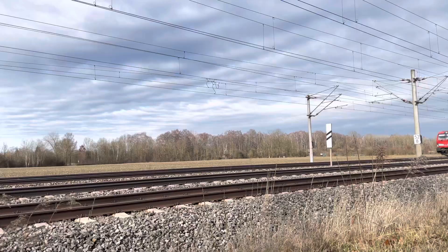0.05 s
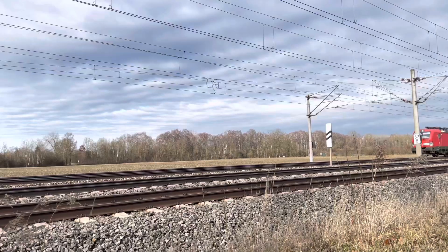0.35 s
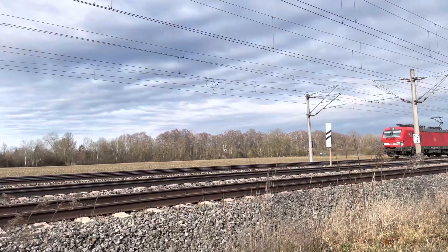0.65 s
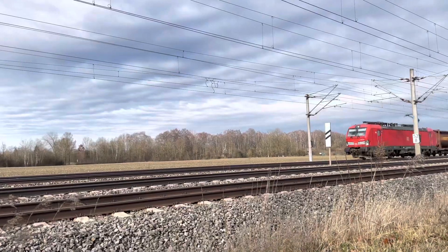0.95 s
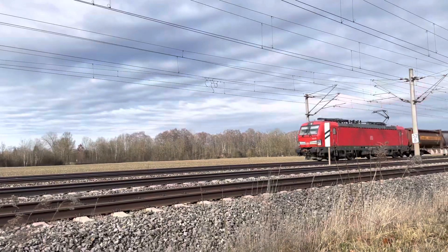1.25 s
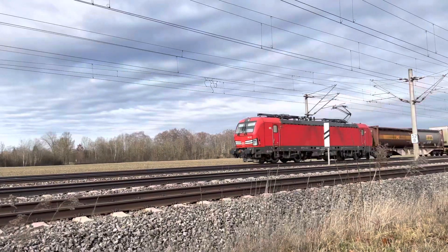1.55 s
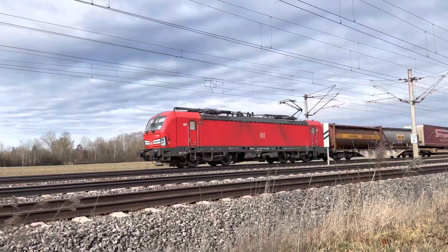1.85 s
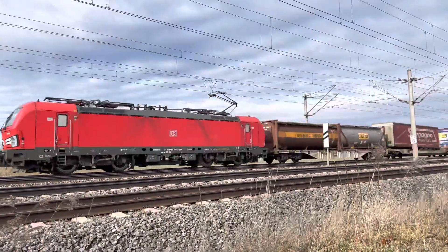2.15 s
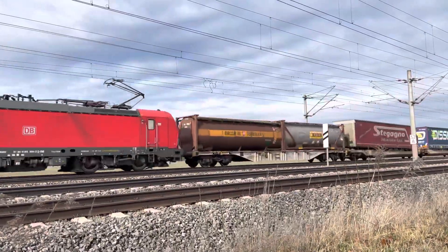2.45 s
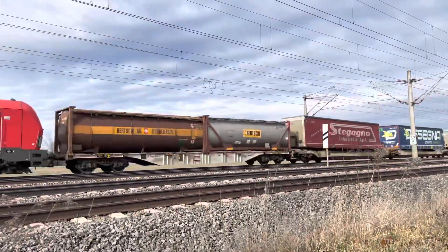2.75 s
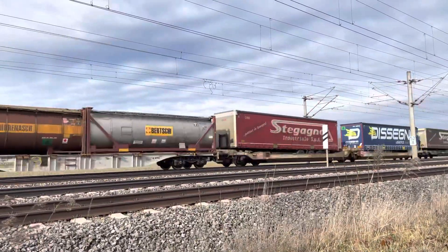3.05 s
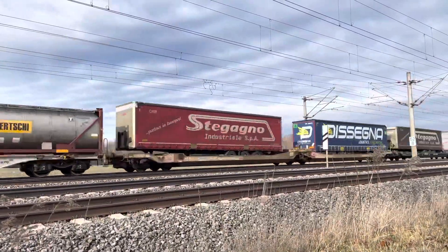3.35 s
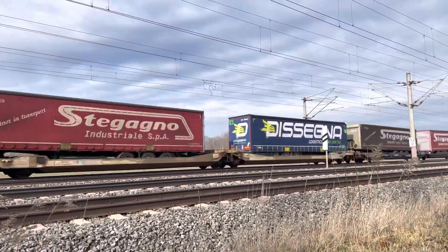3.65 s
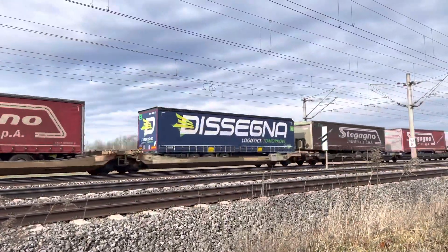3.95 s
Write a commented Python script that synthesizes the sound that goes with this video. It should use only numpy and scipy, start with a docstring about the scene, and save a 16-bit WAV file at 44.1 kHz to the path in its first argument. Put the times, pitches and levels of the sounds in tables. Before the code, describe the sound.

A freight train roars by from right to left, rails hissing and wind rumbling.

```python
"""Wind buffets the microphone and stirs dry grass while the rails hiss and sing off to the right.
Then an electric freight train rushes past, right to left, 18 m from a phone standing in open fields.
Each bogie adds its rolling roar, and the locomotive's whine falls in pitch as it goes by.
The phone's wind filter folds the bass to mono."""
import sys
import numpy as np
from scipy import signal
from scipy.fft import rfft, irfft
from scipy.io import wavfile

SR = 44100
rng = np.random.default_rng(int(sys.argv[2]) if len(sys.argv) > 2 else 0)


def digitize_waveform(pressure):
    """Quantize a signal to 16-bit integers and store it at the path in sys.argv[1].

    Rows of a 2-D input are taken as channels; values are limited to [-1, 1].
    """
    field = np.atleast_2d(pressure).T
    bounded = np.clip(field, -1, 1)
    quanta = np.round(bounded * 32767).astype(np.int16)
    wavfile.write(sys.argv[1], SR, quanta)


N = 176400
T = np.arange(N) / SR
FRAME, OVERLAP = 1024, 768
HZ, FRAME_S = signal.stft(np.zeros(N), SR, nperseg=FRAME, noverlap=OVERLAP)[:2]
HZ = np.maximum(HZ, 1)[:, None]
SIDES = np.array([1, -1])[:, None, None]  # left, right

SPEED_M_S, TRACK_M, SOUND_M_S = 27, 18, 343
AHEAD_M, SWING_M, PORT_LAG_S = 26.6, 17.4, 0.000445  # the phone aims AHEAD_M before the nearest point
CROSS_S, CROSS_LENGTH_S = 2.13, 0.15  # the roar moves from right to left
WHINE_HZ, WHINE_PASS_S, WAGONS_FROM_S = 633.8, 2.92, 3.1

# Bogies going by. Each row: time in seconds when nearest the microphone, relative level in dB.
BOGIE_PASSES = [(2.5, -3), (2.9, -1.5), (3.4, -3.5), (4.0, -5), (4.55, -1), (5.2, -22)]
# Roar of rolling wheels. Each row: frequency in Hz, relative level in dB.
ROAR_SPECTRUM = [(60, -78), (130, -58.5), (215, -54), (330, -61.5), (480, -55), (640, -53.5), (850, -54),
                 (1080, -52.5), (1300, -56.5), (1800, -58.5), (2400, -63), (3300, -61.5), (4200, -66),
                 (5200, -64.5), (6600, -68), (7600, -72.5), (9500, -77), (13000, -85), (14200, -96),
                 (15000, -109)]
# Tone of the wagons' bogies. Each row: frequency in Hz, gain over the locomotive's in dB.
WAGON_COLOUR = [(220, -5), (330, -4), (450, -5.5), (700, -1), (900, -6), (1200, 1.5), (1600, 1.5),
                (2300, -0.5), (7000, 1), (9000, -2)]
# Swells of the whine's partials. Each row: multiple of the pitch, width in Hz, level in dB,
# peak time in seconds, half-length in seconds, left minus right in dB.
WHINE_PARTIALS = [(.98, 12, -32, 2.62, 0.28, -5), (1.005, 11, -34.5, 3.37, 0.3, 4),
                  (2, 18, -25, 2.964, 0.21, 0.5), (2, 76, -29, 2.56, .3, 4),
                  (1.985, 50, -32, 2.24, 0.12, 11), (2.97, 35, -34, 1.944, 0.095, -1),
                  (2.96, 41, -30.5, 2.33, .18, -19), (3.11, 24, -34, 2.22, .2, -11),
                  (3.02, 19, -33.5, 3.13, 0.12, -7), (3.02, 35, -32, 3.556, 0.096, -1),
                  (3.14, 210, -32, 2.26, 0.41, -17)]
# Hiss of the leading wheels. Each row: frequency in Hz, density in dB per Hz.
SIZZLE_SPECTRUM = [(1500, -77), (2900, -68), (5000, -80.5), (7000, -79.5), (8400, -73), (10000, -80),
                   (13000, -94), (15000, -109)]
# Hiss of the rails and distant wagons. Each row: frequency in Hz, relative level in dB.
RAIL_SPECTRUM = [(100, -90), (450, -61), (650, -62), (850, -71), (1100, -64), (1550, -66), (1900, -72),
                 (2300, -84), (2900, -74.5), (3700, -81), (4400, -87), (5200, -82), (6600, -87.5),
                 (8300, -94.5), (9800, -100), (13000, -102), (15000, -112)]
# Rise and fall of that hiss. Each row: time in seconds, gain in dB.
RAIL_SWELL = [(0, -10), (.45, -7), (.75, -3), (1.3, -1), (1.8, 5), (2.5, 5), (4, -8)]
# Singing of the rails. Each row: frequency in Hz, width in Hz, peak density in dB per Hz.
RAIL_RESONANCES = [(1544, 70, -63), (2360, 38, -68.5), (2504, 67, -81.5), (3090, 130, -77),
                   (3930, 130, -76.5), (4400, 150, -79.5)]
# Sound off ballast and wagon sides. Each row: frequency in Hz, scattered over direct in dB.
TRACKSIDE_SCATTER = [(300, -6.5), (1400, -3.5), (3000, 8.5), (7000, 7.5), (9000, 3.5), (12500, 3)]
# Balance of a source on either side of the phone. Each row: frequency in Hz, left minus right in dB.
RIGHT_BALANCE = [(900, -0.5), (1300, 0), (1500, -25), (1750, -12), (2100, 13), (2700, 0), (3300, -3),
                 (3850, -10), (4600, -1), (5400, 3.5), (7200, -3)]
LEFT_BALANCE = [(150, -3), (400, 7.5), (700, 10.5), (1000, 2), (1400, 0.5), (1800, -1.5), (3000, -0.5)]
# Wind rumble on the microphone. Each row: frequency in Hz, relative level in dB.
WIND_SPECTRUM = [(20, -82), (32, -63), (44, -47.5), (70, -49.5), (110, -54.5), (145, -60.5), (205, -59),
                 (400, -69.5), (800, -79), (2000, -110), (8000, -150)]
# Gusting of that wind. Each row: time in seconds, gain in dB.
WIND_GUSTS = [(0, -7.5), (.24, -4), (.32, -1), (.6, 2), (1, -3.5), (1.4, 1.5), (1.7, -1.5), (2.1, -0.5),
              (2.6, -0.5), (3.1, -1.5), (3.4, -3.5), (3.7, 1), (4, 0)]
# Buffets on the microphone, and two crisp crackles of dry grass near 0.55 s. Each row: start in seconds, level
# in dB, centre in Hz, decay in seconds.
WIND_BUFFETS = [(.095, -42.5, 1500, 0.013), (0.261, -26, 470, 0.007), (0.284, -17.5, 70, 0.031),
                (0.311, -26, 210, 0.013), (0.327, -20.5, 148, 0.01), (0.39, -26, 219, 0.024),
                (0.456, -24, 170, 0.009), (0.516, -22, 236, 0.01), (0.537, -20.5, 69, 0.018),
                (0.544, -48, 1570, 0.011), (0.572, -36, 1880, 0.0031), (0.614, -32, 380, 0.047),
                (0.764, -19, 340, 0.008), (0.773, -17, 89.5, 0.017), (.783, -33, 510, 0.02),
                (.79, -24.5, 130, .009), (.943, -26, 523, 0.0063), (1.17, -24.5, 156, 0.015),
                (1.426, -20.5, 87, 0.018), (1.439, -21.5, 111, 0.036), (1.457, -19.5, 245, 0.017),
                (1.487, -20.5, 274, 0.0079), (2.481, -24, 78.5, 0.019), (2.564, -24, 85.4, 0.021),
                (3.531, -23, 216, 0.033), (3.604, -12, 71, 0.0057)]
# Dry grass close by. Each row: start in seconds, level in dB, decay in seconds.
GRASS_RUSTLES = [(.247, -60, 0.013), (0.445, -51.5, 0.012)]
# Tone of a rustle. Each row: frequency in Hz, relative level in dB.
GRASS_SPECTRUM = [(4000, -14), (6500, -2), (9500, -6), (13000, -9), (15000, -19)]
# Narrow dips in the treble. Each row: centre in Hz, width in Hz, gain in dB.
TREBLE_DIPS = [(5570, 220, -8), (7350, 230, -4.5), (9200, 360, -15)]
# The phone's stereo widening. Each row: frequency in Hz, side over mid in dB.
STEREO_WIDTH = [(200, 23), (400, 4.5), (650, 8), (1000, -5.5), (1450, 3), (2000, -2.5), (3000, 3),
                (4500, -2), (5600, 4), (6800, -4.5), (8600, 8.5), (11000, 2.5), (13000, -19)]
# The phone's wind filter. Each row: time in seconds, frequency in Hz below which the sound is mono.
MONO_CORNER = [(0, 725), (2.2, 705), (2.8, 436), (3.3, 271), (4, 164)]


def wheels():
    """Each bogie's roar swells, brightens and crosses to the left; ballast and wagon sides scatter it."""
    beam = np.maximum(1.27 + 0.53 * np.log2(HZ / 1000), 0)  # wheels radiate sideways, the treble most
    direct, power = 0, 0
    for pass_s, db in BOGIE_PASSES:
        _, distance, lag = place(pass_s)
        gain = undb(db + 0.7 * walk(21, FRAME_S)) * (TRACK_M / distance) ** (1 + beam)
        gain = gain * steel_ring(depth_db=4.5, pitch=doppler(pass_s))
        if pass_s > WAGONS_FROM_S:
            gain = gain * colour(WAGON_COLOUR, HZ)
        direct = direct + gain * hiss() * ports(lag)
        power = power + gain ** 2
    scatter = colour(TRACKSIDE_SCATTER, HZ)
    scattered = scatter * np.sqrt(power) * np.array([hiss(), hiss()])
    roar = (direct + scattered) / np.sqrt(1 + scatter ** 2)
    left = (1 + np.tanh((FRAME_S - CROSS_S) / CROSS_LENGTH_S)) / 2
    balance_db = left * shade(LEFT_BALANCE) + (1 - left) * shade(RIGHT_BALANCE)
    judder = undb(-2 + 0.77 * walk(35, FRAME_S))
    return roar * ports(0, balance_db) * colour(ROAR_SPECTRUM, HZ) * judder


def whine():
    """The locomotive's rough tone and its overtones, falling with the Doppler shift."""
    _, _, lag = place(WHINE_PASS_S)
    pitch_hz = np.interp(T, FRAME_S, WHINE_HZ * doppler(WHINE_PASS_S))
    phase = 2 * np.pi * np.cumsum(pitch_hz) / SR
    out = 0
    for multiple, width, db, peak_s, half_s, balance_db in WHINE_PARTIALS:
        carrier = np.exp(1j * multiple * phase) * undb(db) * swell(T, peak_s, half_s)
        steady = 1 / (1 + (width / 33) ** 2)  # partials narrower than 33 Hz are mostly a steady tone
        rough, scattered = (walk(width, T) + 1j * walk(width, T) for _ in range(2))
        direct = split(np.real(carrier * (np.sqrt(2 * steady) + np.sqrt(1 - steady) * rough)))
        echo = split(np.real(carrier * scattered))
        out = out + direct * ports(lag, balance_db) + undb(-10) * echo
    return out


def sizzle():
    """Sharp hiss of the leading wheels as the locomotive arrives."""
    _, _, lag = place(WHINE_PASS_S)
    return track_noise(lag) * colour(SIZZLE_SPECTRUM, HZ) * swell(FRAME_S, peak_s=2.09, half_s=0.28)


def rails():
    """The rails hiss and sing with narrow resonances ahead of the train, from the right."""
    level = undb(curve(RAIL_SWELL, FRAME_S) + 1.04 * walk(29, FRAME_S))
    modes = sum(undb(db) ** 2 / (1 + ((HZ - hz) / width) ** 2) ** 2 for hz, width, db in RAIL_RESONANCES)
    singing = np.sqrt(modes) * swell(FRAME_S, peak_s=1.85, half_s=0.88)
    gain = np.hypot(colour(RAIL_SPECTRUM, HZ) * level, singing) * steel_ring(depth_db=3.5, pitch=0.95)
    return track_noise(lag_s=0.00045, scatter_db=0.5) * ports(0, shade(RIGHT_BALANCE)) * gain


def wind():
    """Fluttering rumble on the microphone; each buffet is a pressure push followed by eddies."""
    out = noise(lambda f: colour(WIND_SPECTRUM, f)) * undb(curve(WIND_GUSTS, T) + 1.3 * walk(26, T))
    for start, db, hz, decay in WIND_BUFFETS:
        eddy = noise(lambda f: 1 / (1 + np.log2(f / hz) ** 2) ** 2)
        cycles = np.clip((T - start) * hz, 0, 20)
        push = 3 * np.sin(2 * np.pi * cycles) * np.exp(-cycles / 1.16)
        out = out + burst(eddy / eddy.std() + push, start, db, rise_s=0.00063, decay_s=decay)
    return signal.sosfilt(signal.butter(2, [35, 4000], "band", fs=SR, output="sos"), out)


def grass():
    """Dry grass gives brief crisp rustles close to the microphone."""
    return sum(burst(noise(lambda f: colour(GRASS_SPECTRUM, f)), start, db, rise_s=0.003, decay_s=decay)
               for start, db, decay in GRASS_RUSTLES)


def place(pass_s):
    """Metres past the nearest point, distance and port lag of something riding on the train."""
    along = SPEED_M_S * (FRAME_S - pass_s)
    lag = -PORT_LAG_S * np.tanh((along + AHEAD_M) / SWING_M)
    return along, np.hypot(along, TRACK_M), lag


def doppler(pass_s):
    """Pitch factor of something on the train: high coming, low going."""
    along, distance, _ = place(pass_s)
    return 1 / (1 + SPEED_M_S / SOUND_M_S * along / distance)


def steel_ring(depth_db, pitch):
    """Close resonances of the steel ripple a spectrum and slide with the pitch factor."""
    hz = np.arange(0, SR / 2, 35)
    heights = rng.standard_normal(FRAME * 2)[:len(hz)]
    return undb(depth_db * np.interp(HZ / pitch, hz, heights))


def track_noise(lag_s, scatter_db=0):
    """Noise at both ports: a direct wave plus what ballast and wagon sides scatter."""
    scatter = colour(TRACKSIDE_SCATTER, HZ) * undb(scatter_db)
    return (hiss() * ports(lag_s) + scatter * np.array([hiss(), hiss()])) / np.sqrt(1 + scatter ** 2)


def ports(lag_s, balance_db=0):
    """Response of the two microphone ports; the left is late by lag_s and louder by balance_db."""
    return np.exp(-1j * np.pi * SIDES * HZ * lag_s) * np.sqrt(2 / (1 + undb(-2 * SIDES * balance_db)))


def burst(x, start, db, rise_s, decay_s):
    """Cut a swelling, dying burst out of a noise and set its level."""
    age = np.clip(T - start, 0, 20 * decay_s)
    env = (1 - np.exp(-age / rise_s)) * np.exp(-age / decay_s)
    return undb(db) * x * env / env.max() * np.sqrt(np.sum(env ** 2) / np.sum((x * env) ** 2))


def swell(t, peak_s, half_s):
    """Gain of 1 at peak_s, halved half_s before and after."""
    return 1 / (1 + ((t - peak_s) / half_s) ** 2)


def noise(gain):
    """Noise whose density per root Hz is gain(Hz)."""
    hz = np.maximum(np.fft.rfftfreq(N, 1 / SR), 1)
    return irfft(rfft(rng.standard_normal(N)) * gain(hz), N) * np.sqrt(SR / 2)


def hiss():
    """Short-time spectra of white noise at 0 dB per Hz."""
    return split(rng.standard_normal(N)) * np.sqrt(SR / 2)


def walk(rate, t):
    """Smooth random drift of spread 1 that changes about rate times a second."""
    x = noise(lambda f: np.exp(-(f / rate) ** 2))
    return np.interp(t, T, x / x.std())


def curve(rows, t):
    """Straight lines through (s, value) rows."""
    return np.interp(t, *np.array(rows, float).T)


def colour(rows, hz):
    """Gain from (Hz, dB) rows."""
    f, db = np.array(rows, float).T
    return undb(np.interp(np.log(hz), np.log(f), db))


def shade(rows):
    """Left minus right in dB at each frequency."""
    return 20 * np.log10(colour(rows, HZ))


def undb(db):
    """Decibels to gain."""
    return 10 ** (np.asarray(db) / 20)


def split(x):
    """Sound to short-time spectra."""
    return signal.stft(x, nperseg=FRAME, noverlap=OVERLAP)[2]


def join(z):
    """Short-time spectra to sound."""
    return signal.istft(z, nperseg=FRAME, noverlap=OVERLAP)[1][..., :N]


def scene():
    """The train across the field, with wind and grass at the microphone."""
    return join(rails() + wheels() + sizzle() + whine()) + wind() + grass()


def record(dry):
    """The treble has narrow dips; the phone widens the stereo, makes the bass mono and cuts the top."""
    dips_db = sum(db * np.exp(-((HZ - hz) / width) ** 2) for hz, width, db in TREBLE_DIPS)
    left, right = split(dry) * undb(dips_db)
    mid, side = (left + right) / 2, (left - right) / 2
    stereo = 1 / (1 + (curve(MONO_CORNER, FRAME_S) / HZ) ** 6)
    wide = np.sqrt(colour(STEREO_WIDTH, HZ))
    out = join(mid / wide ** stereo + SIDES * side * wide * stereo)
    out = out * (T > 0.036)  # silent for the first instant
    return signal.sosfilt(signal.ellip(8, .2, 70, 14600, fs=SR, output="sos"), out)


dry = scene()
out = record(dry)
digitize_waveform(out)
```